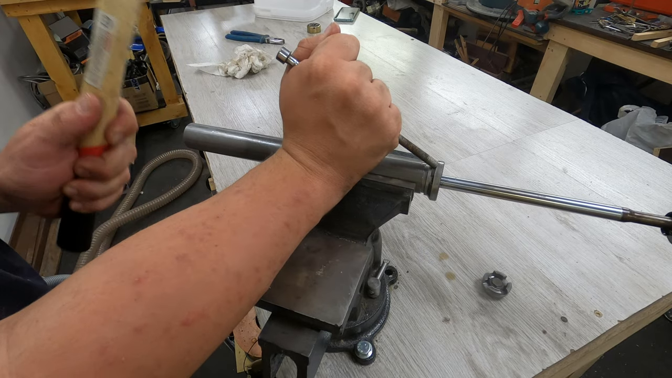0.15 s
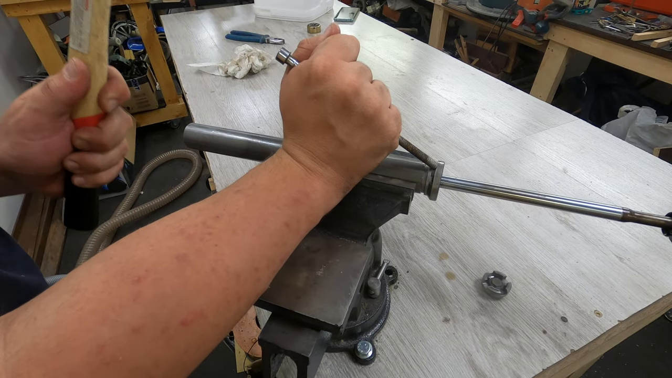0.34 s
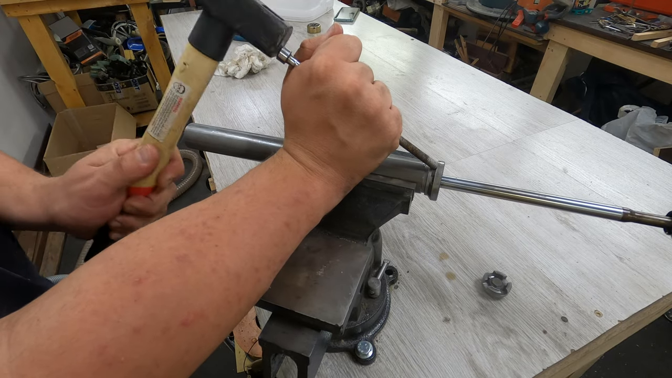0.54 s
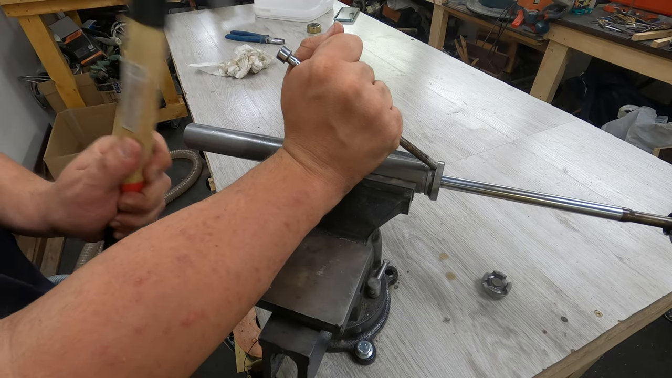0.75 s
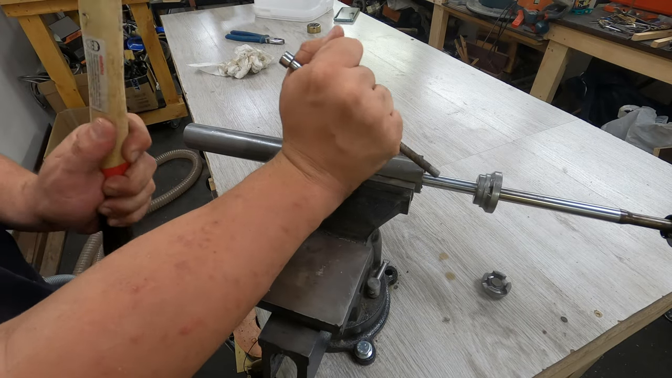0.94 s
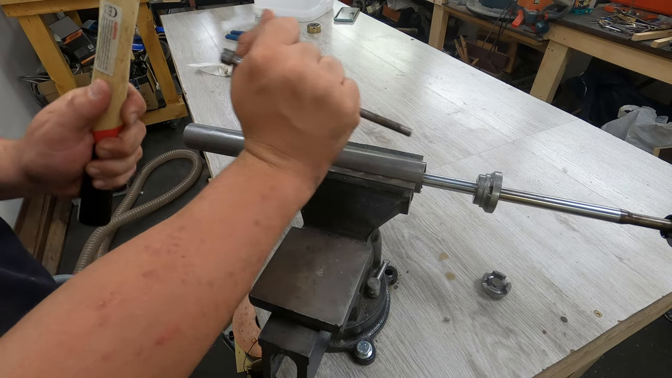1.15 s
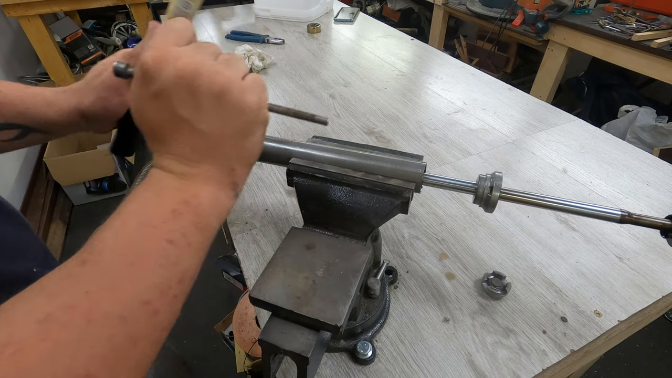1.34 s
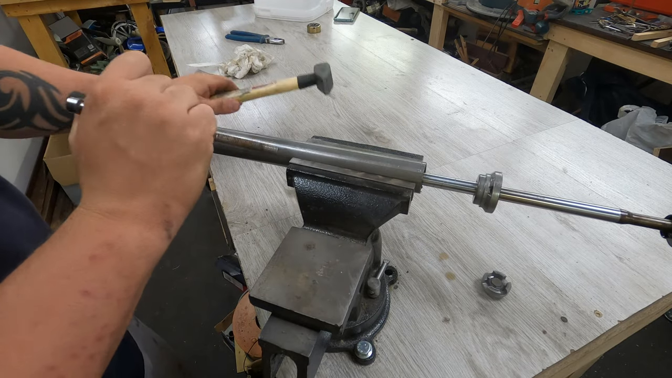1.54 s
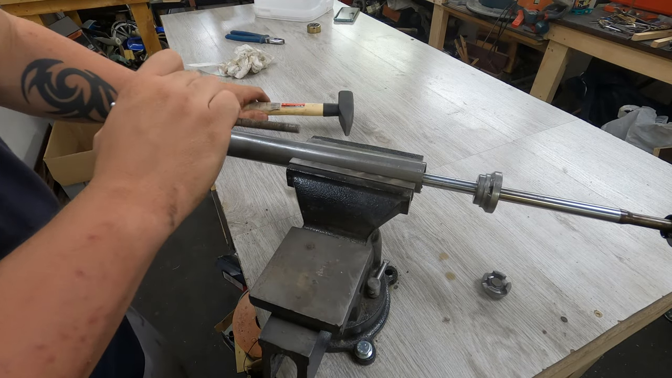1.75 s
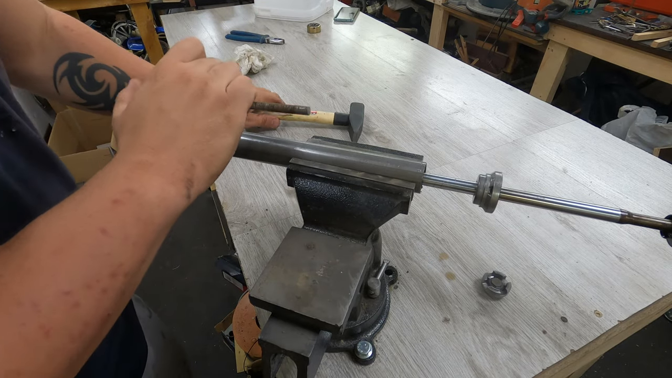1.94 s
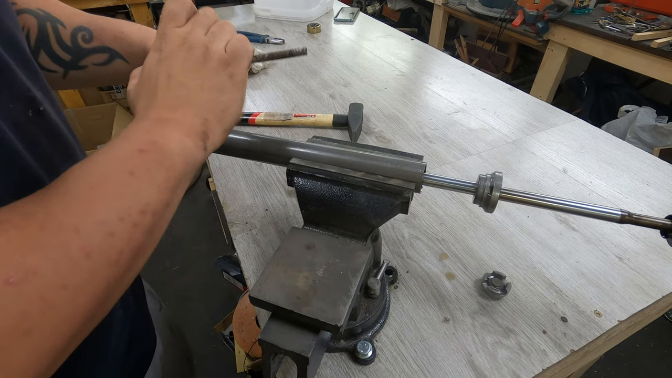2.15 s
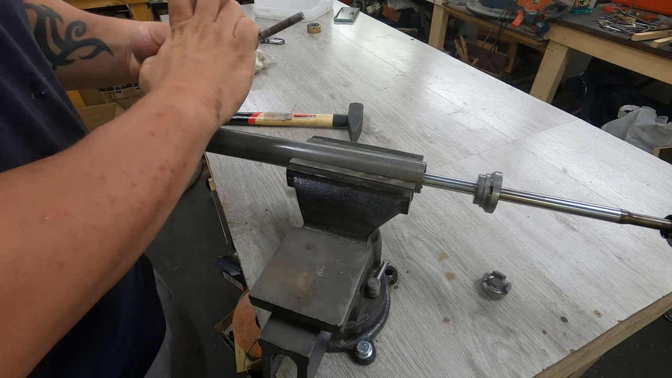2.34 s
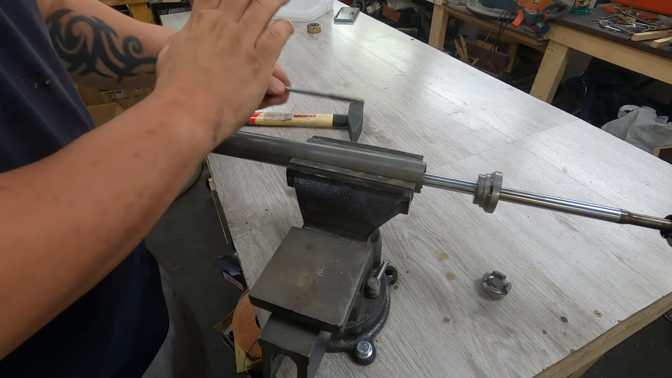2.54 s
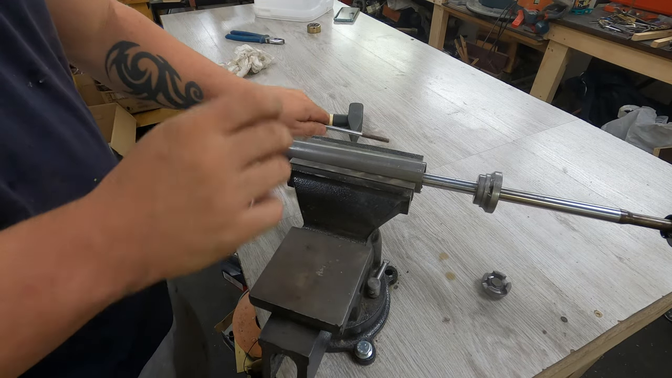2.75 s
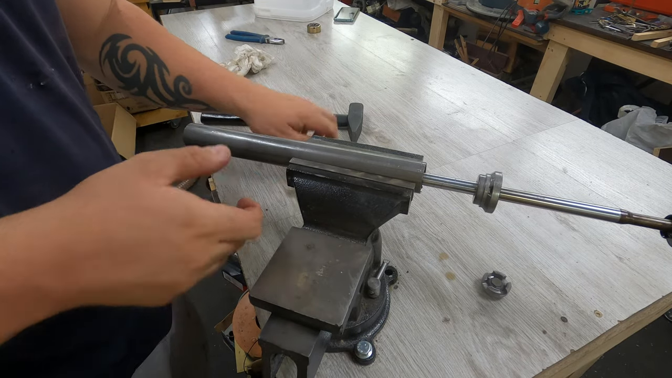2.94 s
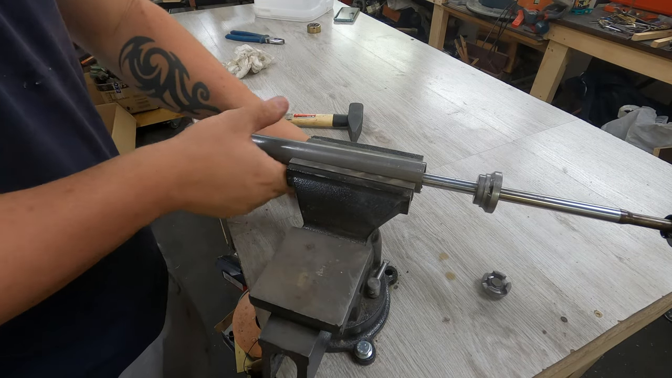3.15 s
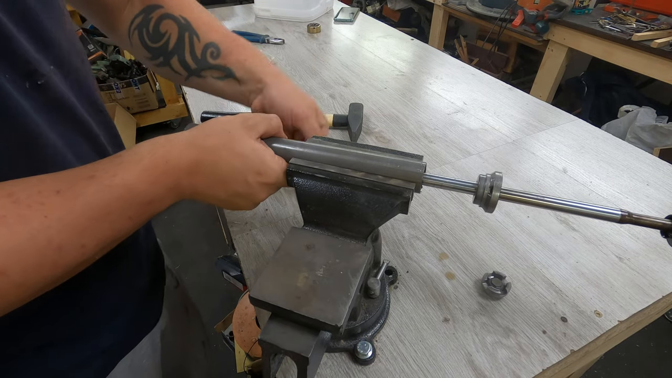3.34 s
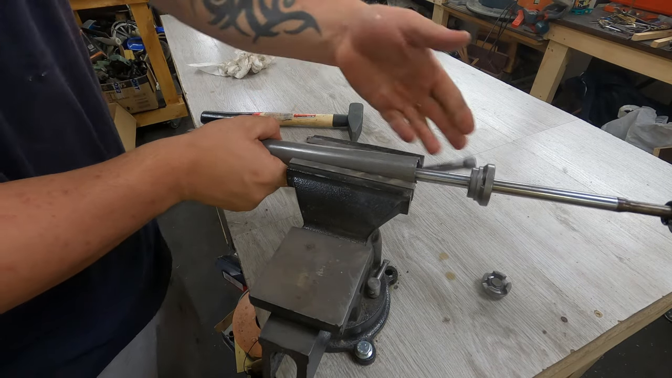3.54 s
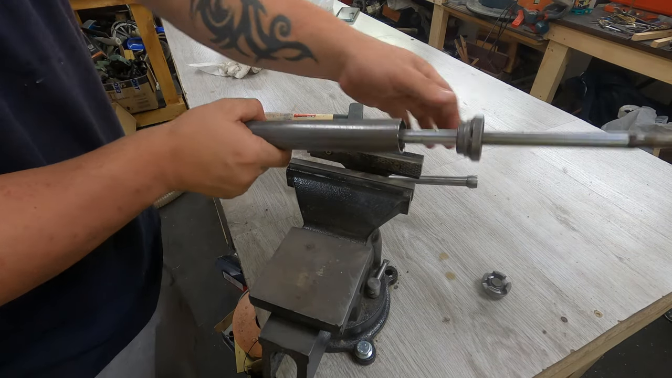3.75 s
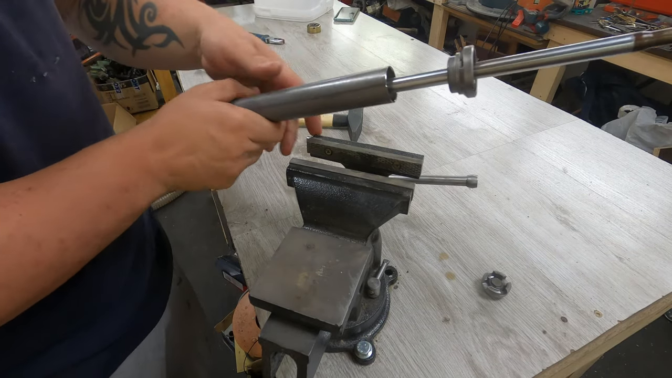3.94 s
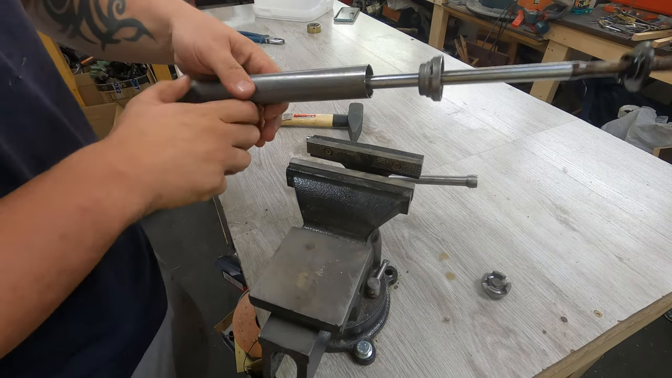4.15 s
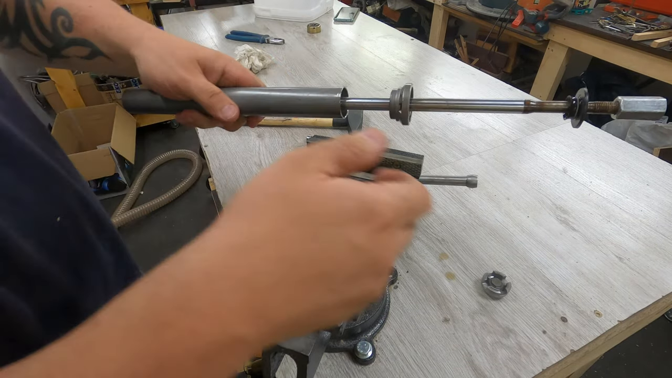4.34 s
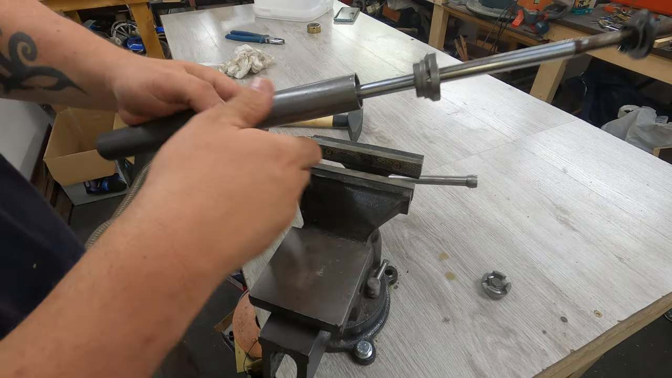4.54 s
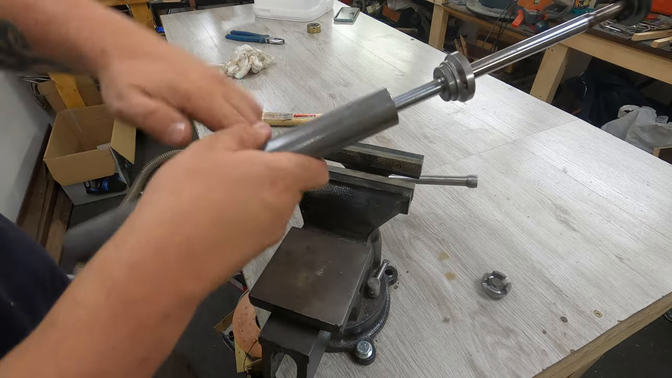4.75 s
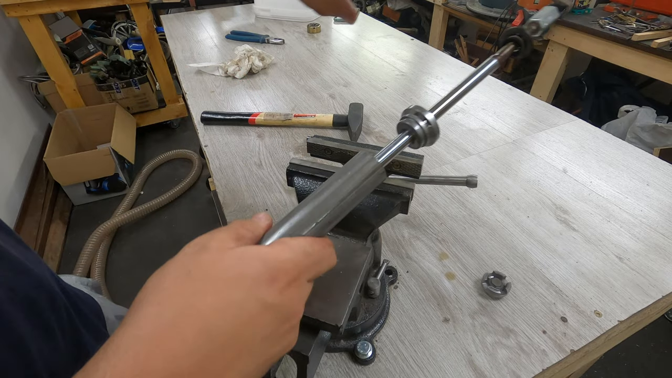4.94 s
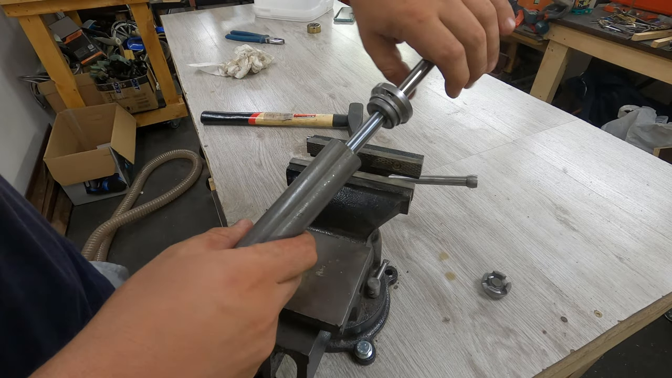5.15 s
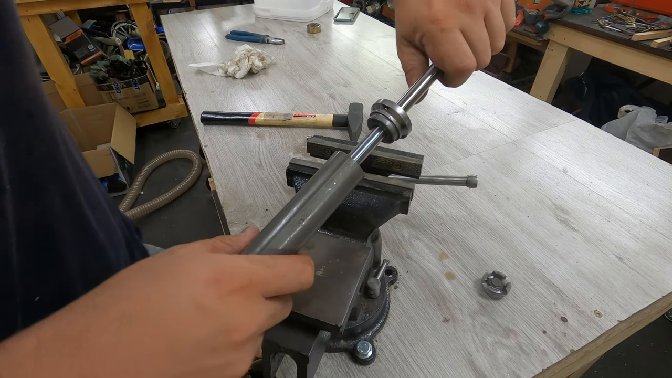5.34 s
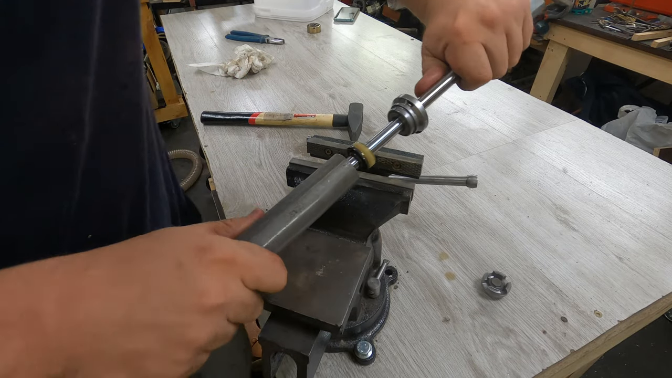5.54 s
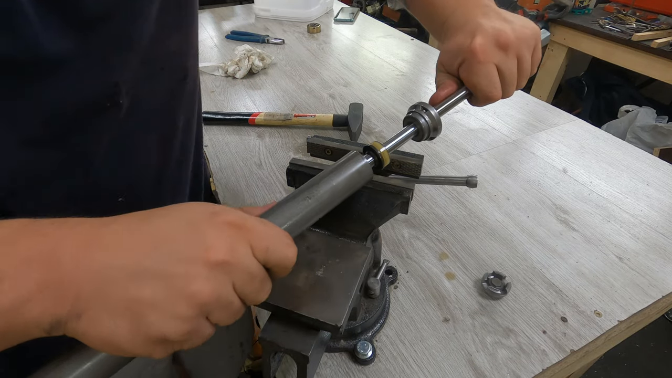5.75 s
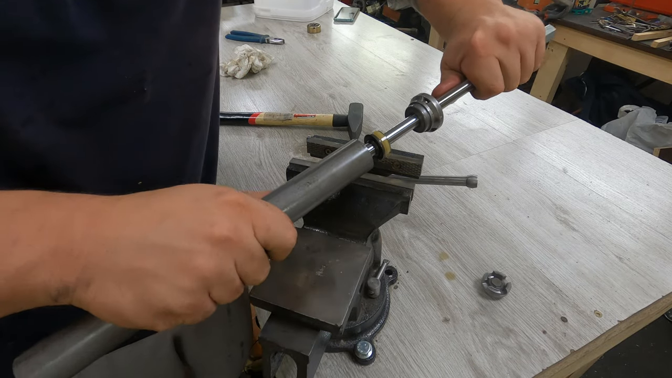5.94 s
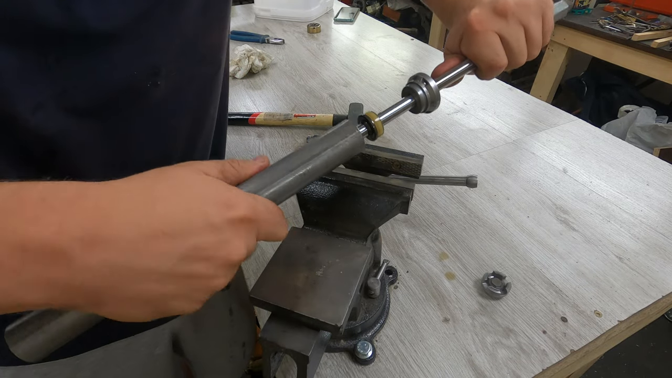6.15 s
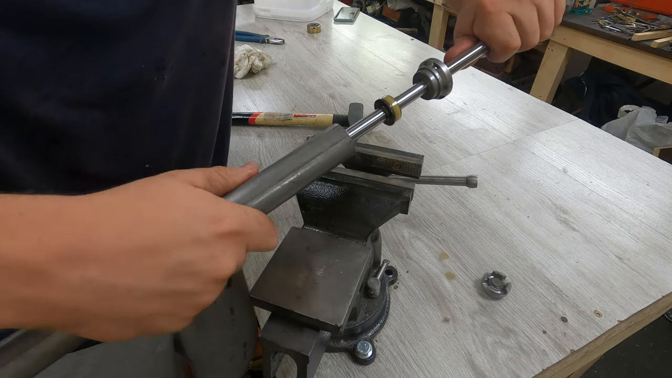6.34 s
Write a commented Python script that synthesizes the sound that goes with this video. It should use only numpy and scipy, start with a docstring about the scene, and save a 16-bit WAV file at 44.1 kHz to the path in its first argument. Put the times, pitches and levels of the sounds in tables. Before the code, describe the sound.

Close metallic hammering cracks in a live little workshop, then hammer and punch are set down, a vise loosens, and palms rub steel as a piston slides out.

```python
"""Dismantling a steel tube at the vise

A small, live workshop: a hammer drives a punch near the stereo microphones, then both tools are laid down.
The vise screw rattles open, and the piston rod is drawn out of the tube under rubbing palms.
Contacts are short force pulses into ringing modes and damped bodies; rubbing is a stream of tiny slips.
Low hum, mains hum and a far engine lie over still air; the recorder's limiter ducks the hardest blows."""
import sys
import numpy as np
from scipy import signal
from scipy.fft import rfft, irfft, next_fast_len
from scipy.io import wavfile
from scipy.ndimage import uniform_filter1d

SR = 44100
rng = np.random.default_rng(int(sys.argv[2]) if len(sys.argv) > 2 else 0)


def master_out(mix):
    """Clip the mix to full scale and print it as 16-bit PCM to the path in sys.argv[1]."""
    frames = np.transpose(np.atleast_2d(mix))
    ceiling = np.clip(frames, -1, 1)
    pcm = np.round(ceiling * 32767).astype(np.int16)
    wavfile.write(sys.argv[1], SR, pcm)


N = 286202
LEAD = SR // 5  # samples worked out ahead of the start, so that earlier sounds can ring in
TIME = np.arange(-LEAD, N) / SR  # seconds
SIZE = len(TIME)

# Contacts; strengths and thuds are relative, the contact edge is where the force loses its treble.
# Hammer on punch. Each row: start in seconds, strength in dB, contact edge in Hz, bench thud in dB.
HAMMER_BLOWS = [(-.13, 13, 11000, 13.5), (0.1318, 6.5, 16000, 7), (0.65, 0.5, 7530, 0),
                (0.8852, 5.5, 14000, 4.5)]
# Hammer laid on the wooden bench. Each row: start in seconds, strength in dB, contact edge in Hz,
# bench thud in dB.
HAMMER_KNOCKS = [(1.9445, 5.5, 10000, -6), (1.981, 7, 5030, 1.5), (1.99, 3, 2500, -20.5),
                 (2.0223, -9, 9040, 4)]
# Punch put down against steel. Each row: start in seconds, strength in dB, contact edge in Hz,
# bench thud in dB, pitch that rings most where it touches in Hz.
PUNCH_CLANKS = [(2.1118, -0.5, 5830, -1, 3980), (2.1722, -6.5, 5750, -7, 4030),
                (2.207, -17.5, 6000, -11, 3630), (2.896, -11.5, 3600, -14, 1770),
                (2.9564, 2, 9000, -4, 3100), (3.016, -21.5, 8000, -23, 2900),
                (3.022, -10.5, 9000, -21.5, 2950), (3.028, -5.5, 8000, -21.5, 3340),
                (3.051, -16.5, 7000, -27, 3300)]
# Light touches of steel parts. Each row: start in seconds, strength in dB.
STEEL_TICKS = [(0.911, -8), (1.011, -21.5), (1.803, -36), (3.227, -26.5), (3.633, -32), (3.722, -26.5),
               (3.76, -33), (5.4014, -31), (5.6187, -26.5), (6.0114, -22)]
# Punch ringing freely as it first touches. Each row: start in seconds, strength in dB, contact edge in Hz.
PUNCH_PINGS = [(2.8849, -1, 15320), (2.9562, -14, 12440)]
# Vise handle dropping against its stop and chattering. Each row: start in seconds, strength in dB,
# contact edge in Hz.
HANDLE_CLINKS = [(3.2585, -20.5, 4820), (3.2607, -17, 4200), (3.2651, -13.5, 1670)]
# Loose rod touching the tube. Each row: start in seconds, strength in dB, contact edge in Hz.
ROD_CHINKS = [(4.745, -35, 11530), (4.777, -30, 2230), (4.821, -43, 9000), (5.2308, -28.5, 2780),
              (5.2913, -41, 2983)]

# Dense, quickly damped responses: punch, wooden bench top, steel parts, bench shaken by heavy contacts,
# vise screw, piston in its bore, palms on steel. Each row: frequency in Hz, relative level in dB.
PUNCH_RESPONSE = [(400, 0.5), (550, 3.5), (730, -11.5), (1050, -2.5), (1700, -8.5), (2200, -2), (3000, -3),
                  (4100, -2.5), (6000, -5), (7700, -9.5), (8600, -12), (10200, -14.5), (12000, -25.5),
                  (16000, -25)]
WOOD_RESPONSE = [(60, -12), (100, 1), (170, 2), (250, -4), (450, 0), (600, -8.5), (1000, -7), (1500, -13),
                 (2200, -20), (3500, -23), (5500, -27.5), (8000, -39), (11000, -55.5), (16000, -82.5)]
STEEL_RESPONSE = [(200, -10.5), (320, 4), (600, 4.5), (900, 2), (1600, 6), (2400, 0), (3000, 3), (4200, -1),
                  (5500, -1.5), (7000, -12), (8200, -17.5), (10000, -31), (16000, -42.5)]
BENCH_RESPONSE = [(25, -9), (80, -6.5), (130, -7), (180, 2), (250, -0.5), (330, -3), (430, -17.5),
                  (700, -25), (1500, -40), (16000, -110)]
SCREW_RESPONSE = [(110, 7.5), (200, 2.5), (340, 7), (480, -5), (630, 6.5), (780, -1.5), (1250, -1),
                  (1700, -9), (2150, -6), (2900, -11), (3400, -16.5), (4500, -20.5), (6500, -24),
                  (9000, -42), (16000, -49)]
BORE_RESPONSE = [(290, -6.5), (500, -18.5), (766, -13), (823, -20), (1030, -5.5), (2070, -2), (2570, -6.5),
                 (4170, -14), (4600, -21), (5620, -17.5), (7360, -25.5), (15000, -68)]
PALM_RESPONSE = [(1100, 2.5), (1500, 6), (2300, 5.5), (3000, 3.5), (4500, 3.5), (6000, 1.5), (7500, -4.5),
                 (9000, -8.5), (12500, -17), (16000, -33)]

# Ringing modes: hammer head with loaded punch (brief and bright), clamped tube, vise jaws, free punch,
# vise handle, loose rod, bench. Each row: frequency in Hz, height in dB, time to decay by 60 dB in seconds.
HEAD_RING = [(2290, -28.5, 0.015), (3040, -33.5, 0.0058), (3940, -35.5, 0.0046), (5150, -24.5, 0.023),
             (7600, -29.5, 0.007)]
TUBE_RING = [(1335, -72, 1.3), (1362, -49, .18), (2223, -49, .15), (4091, -57, .65), (5351, -61, .2)]
JAW_RING = [(1175, -42, 0.027), (1516, -24.5, 0.047), (2340, -43.5, 0.019), (2963, -30.5, 0.11),
            (4190, -30.5, .025), (5300, -42, 0.16)]
PUNCH_RING = [(2840, -40.5, 0.043), (5540, -24, 0.065), (9087, -47, 0.4), (13400, -70.5, 0.28),
              (14900, -81.5, 0.23)]
HANDLE_RING = [(1141, -25, .03), (1355, -15.5, .036), (1800, -21, .018), (2500, -13.5, .016),
               (3260, -25, .015), (3740, -26, .015), (4500, -19, .01)]
ROD_RING = [(2220, -23, .09), (2570, -23, .03), (3700, -34, .04), (4480, -26, .1), (5000, -25, .02),
            (6000, -26, .12)]
BENCH_RING = [(38, -42, .15), (100, -47, .3), (158, -42, .2), (174, -28, .3), (192, -38, .18),
              (222, -39, .2), (241, -37, .28), (328, -38, .18), (501, -49, .2)]

# Palms rubbing over steel, one row for each shift of grip. Each row: firmest moment in seconds,
# level in dB, length in seconds, extra hiss in dB.
PALM_RUBS = [(3.505, -65.5, 0.19, 1.5), (4.057, -70, 0.32, 2), (4.234, -65.5, 0.34, 5.5),
             (4.48, -72.5, 1, -5), (4.723, -62.5, 0.13, 8.5), (4.824, -73.5, 0.14, 14.5),
             (5.102, -69, 0.78, -7.5), (5.469, -60.5, 0.43, -1), (5.66, -62, 0.083, -7),
             (5.943, -55, 0.45, -5.5), (6.221, -73.5, 0.18, 4), (6.42, -74.5, 0.3, 8.5)]
# Difference between right and left in the close treble: the left is louder around 2-6 kHz, the right below and
# above. Each row: frequency in Hz, right minus left in dB.
SIDE_TILT = [(200, 11), (2000, -2), (4000, -6.5), (8000, 3), (14000, 7.5)]
# Left-right likeness of diffuse sound. Each row: frequency in Hz, likeness from 0 to 1.
STEREO_LIKENESS = [(30, 0.5), (70, 1), (250, 0.97), (1000, 0.73), (2500, 0.72), (6000, 0.1), (14000, 0.4)]
# Decay of the workshop. Each row: frequency in Hz, time to decay by 60 dB in seconds.
ROOM_DECAY = [(80, 0.53), (250, 0.28), (700, 0.32), (2000, 0.32), (5000, 0.29), (9000, 0.29), (15000, 0.19)]
# Far engine speeding up and slowing. Each row: top speed in seconds, top pitch in Hz, glide in Hz per second,
# level in dB, rise in seconds, fall in seconds.
ENGINE_REVS = [(2.9, 102.8, 6, -53, 1.0, 4.1), (5.762, 81.36, 25, -39.5, 1.26, 1.12)]
# Level of the low hum. Each row: time in seconds, level in dB.
HUM_LEVEL = [(1.05, -68), (1.64, -45.5), (2.81, -48), (3.03, -70), (3.29, -48), (3.81, -57), (5.73, -48.5),
             (6.49, -56.5)]
# Still air of the shop. Each row: frequency in Hz, relative level in dB.
STILL_AIR = [(15, 1), (27, -2.5), (45, -15.5), (70, -5), (110, -14), (160, -22), (240, -20), (400, -32),
             (800, -46.5), (1150, -37), (2000, -45.5), (4000, -53.5), (7700, -58), (10000, -80)]

TICK_EDGE_HZ = 17000
# The screw rattles open in one quick turn, which goes on shaking the bench a little longer.
SCREW_START_S, SCREW_ATTACK_S, SCREW_HOLD_S, SCREW_RELEASE_DB_PER_S = 3.544, 0.025, 0.081, 446
SCREW_DB, SHAKE_DB, SHAKE_LINGER_S = -37, -46.5, 0.079
# The piston comes free, then slides out in one pull.
PULL_START_S, PULL_FASTEST_S, PULL_RISE_S, PULL_FALL_S, PULL_DB = 5.618, 5.835, 0.19, 0.22, -45.5
RUB_RISE_SHARE, HISS_ABOVE_HZ = 0.62, 6200
# A movement swells and fades: dB down at its two ends, and the roundness of its top (1 = pointed).
SWELL_DB, SWELL_ROUNDNESS = 22, 1.164
HUM_HZ, MAINS_HZ, MAINS_DB, AIR_DB = 44, 100, -63.5, -52
TOP_CUT_HZ = 17300


def from_db(db):
    """Decibels to gain."""
    return 10 ** (np.asarray(db) / 20)


def rms_one(x):
    """Scale to rms 1."""
    return x / np.sqrt(np.mean(x ** 2) + 1e-20)


def at_hz(points, hz):
    """Read a table on a log-frequency axis."""
    f, value = np.transpose(points)
    return np.interp(np.log(hz + 1e-3), np.log(f), value)


def gain_at(spectrum, hz):
    """Gain of a spectrum, falling steeply below its first point."""
    bass_fall = np.clip(hz / spectrum[0][0], .01, 1) ** 2
    return from_db(at_hz(spectrum, hz)) * bass_fall


def filtered(x, kind, edge_hz):
    """Second-order low-pass or high-pass filter."""
    return signal.sosfilt(signal.butter(2, edge_hz, kind, fs=SR, output="sos"), x)


def convolve(x, response):
    """Pass a sound through a mono or stereo response."""
    return signal.fftconvolve(np.atleast_2d(x), np.atleast_2d(response), axes=1)[:, :SIZE]


def diffuse(spectrum, size):
    """Coloured stereo noise whose sides are alike by frequency; rms 1."""
    padded = next_fast_len(size)
    hz = np.fft.rfftfreq(padded, 1 / SR)
    mid, side = rfft(rng.standard_normal((2, padded)))
    alike = at_hz(STEREO_LIKENESS, hz)
    pair = np.sqrt(1 + alike) * mid + np.sqrt(1 - alike) * side * [[1], [-1]]
    return rms_one(irfft(pair * gain_at(spectrum, hz), padded)[:, :size])


def drift(rate):
    """Slow chance: random points of spread 1, rate of them per second, joined by lines."""
    return np.interp(TIME - TIME[0], np.arange(2000) / rate, rng.standard_normal(2000))


def contacts(rows, size=256):
    """One force pulse for each contact; a softer contact has a lower edge."""
    force = np.zeros(SIZE)
    for start_s, db, edge_hz, *_ in rows:
        at = LEAD + round(start_s * SR)
        softening = signal.butter(2, min(edge_hz, .45 * SR), fs=SR)
        pulse = signal.lfilter(*softening, signal.unit_impulse(size))
        force[at:at + size] += from_db(db) * pulse
    return force


def body(force, spectrum, size=8192):
    """Many damped modes merge into one causal (minimum-phase) response of unit energy."""
    cepstrum = irfft(np.log(gain_at(spectrum, np.fft.rfftfreq(size, 1 / SR))))
    response = irfft(np.exp(rfft(2 * cepstrum[:size // 2], size)))
    return convolve(force, response / np.linalg.norm(response))[0]


def ring(force, modes, uneven_db=2.0):
    """Each mode is a decaying sine, excited more or less depending on where the contact falls."""
    out = 0
    for k, (hz, db, t60) in enumerate(modes):
        radius = from_db(-60 / (t60 * SR))  # decay over one sample
        angle = 2 * np.pi * hz / SR
        drive = force * from_db(db + uneven_db * drift(60))
        poles = [1, -2 * radius * np.cos(angle), radius * radius]
        mode = signal.lfilter([0, np.sin(angle)], poles, drive + 1e-18)
        out = out + (-1) ** k * mode  # neighbouring modes have opposite signs
    return out


def friction(per_s, spread_db):
    """Tiny slips of uneven size at random moments; rms 1."""
    size_db = spread_db * np.minimum(rng.exponential(1, SIZE), 4)
    slips = from_db(size_db) * rng.choice([-1, 1], SIZE)
    return rms_one(slips * (rng.random(SIZE) < per_s / SR))


def swell(top_s, rise_s, fall_s):
    """Gain of one movement, which gathers speed up to its top and slows again."""
    away = np.maximum((top_s - TIME) / rise_s, (TIME - top_s) / fall_s)
    return from_db(-np.minimum(SWELL_DB * away ** SWELL_ROUNDNESS, 200))


def tone(hz):
    """A sine of rms 1 on a pitch curve."""
    return np.sqrt(2) * np.sin(2 * np.pi * np.cumsum(hz) / SR)


def hammering():
    """Each blow cracks through the punch with a colour of its own; the clamped tube rings on."""
    force = contacts(HAMMER_BLOWS)
    head = ring(force, HEAD_RING, uneven_db=3.5)
    tube = ring(force, TUBE_RING, uneven_db=1.0)
    return body(force, PUNCH_RESPONSE) + head, tube


def tools_laid_down(clatter_db=4.5, spot_db=-8, spot_t60_s=0.003):
    """The hammer knocks on wood; the punch clatters on the vise, each spot with a brief ring of its own."""
    knocks = body(contacts(HAMMER_KNOCKS), WOOD_RESPONSE)
    force = contacts(PUNCH_CLANKS)
    clatter = from_db(clatter_db) * body(force, STEEL_RESPONSE)
    jaws = ring(force, JAW_RING, uneven_db=3.0)
    spots = 0
    for row in PUNCH_CLANKS:
        spots = spots + ring(contacts([row]), [(row[-1], spot_db, spot_t60_s)], uneven_db=1.0)
    return knocks + clatter + jaws + spots


def free_rings(click_db=3.5):
    """Punch, vise handle and rod ring freely at their own modes, close to the microphones."""
    clink = contacts(HANDLE_CLINKS)
    punch = ring(contacts(PUNCH_PINGS), PUNCH_RING, uneven_db=.5)
    handle = ring(clink, HANDLE_RING, uneven_db=.5)
    rod = ring(contacts(ROD_CHINKS), ROD_RING, uneven_db=2.0)
    click = from_db(click_db) * body(clink, STEEL_RESPONSE)
    return punch + handle + click + rod


def screw_turn(hold_s):
    """Force of the turn: attack, hold, release."""
    t = TIME - SCREW_START_S
    released_s = np.clip(t - SCREW_ATTACK_S - hold_s, 0, 1)
    return np.clip(t / SCREW_ATTACK_S, 0, 1) * from_db(-SCREW_RELEASE_DB_PER_S * released_s)


def vise_screw():
    """The loose thread rattles; gives its sound and the force that shakes the bench."""
    rattle = friction(per_s=700, spread_db=2.5)
    sound = body(from_db(SCREW_DB) * screw_turn(SCREW_HOLD_S) * rattle, SCREW_RESPONSE)
    shake = from_db(SHAKE_DB) * screw_turn(SCREW_HOLD_S + SHAKE_LINGER_S) * rattle
    return sound, shake


def piston_pull(judder_db=3.0):
    """The piston scrapes along the bore in many tiny slips, with an uneven judder."""
    pull = swell(PULL_FASTEST_S, PULL_RISE_S, PULL_FALL_S) * (TIME > PULL_START_S)
    scrape = body(friction(per_s=5000, spread_db=0.0), BORE_RESPONSE)
    return from_db(PULL_DB) * pull * from_db(judder_db * drift(45)) * scrape


def palm_rubs():
    """The hands shift their grip in slips of skin on steel; dry skin hisses more."""
    skin = body(friction(per_s=5700, spread_db=5.5), PALM_RESPONSE)
    # filtered both ways, so that the hiss can be subtracted cleanly
    hiss = signal.sosfiltfilt(signal.butter(2, HISS_ABOVE_HZ, "high", fs=SR, output="sos"), skin)
    out = 0
    for top_s, db, length_s, hiss_db in PALM_RUBS:
        rub = swell(top_s, RUB_RISE_SHARE * length_s, (1 - RUB_RISE_SHARE) * length_s)
        out = out + from_db(db) * rub * (skin - hiss + from_db(hiss_db) * hiss)
    return out


def small_touches(thin_hz=1300):
    """Light contacts move too little mass to sound in the bass."""
    ticks = [(start_s, db, TICK_EDGE_HZ) for start_s, db in STEEL_TICKS]
    force = contacts(ticks + ROD_CHINKS)
    return body(filtered(force, "high", thin_hz), STEEL_RESPONSE)


def near_field(x, glance_s=0.0014, glance_db=-15, ripple=0.21, split_hz=1100, size=700):
    """Vise, tube and hands scatter the treble over a few milliseconds, differently for each microphone."""
    t, hz = np.arange(size) / SR, np.fft.rfftfreq(2 * size, 1 / SR)
    envelope = np.exp(-(t / .0026) ** 2) + from_db(glance_db) * np.exp(-t / glance_s)
    paths = rfft(diffuse([(20, 0), (20000, 0)], size) * envelope, 2 * size)
    paths = paths / np.abs(paths) ** (1 - ripple)  # the paths smear more than they colour
    scatter = irfft(paths)[:, :size]
    scatter /= np.linalg.norm(scatter, axis=1, keepdims=True)
    tilt = from_db(at_hz(SIDE_TILT, hz) * [[-.5], [.5]])  # half off the left, half onto the right
    scatter = irfft(rfft(scatter, 2 * size) * tilt)[:, :size]
    return filtered(x, "low", split_hz) + convolve(filtered(x, "high", split_hz), scatter)


def workshop(x, room_db, build_s=0.0027):
    """Reflections build up quickly and die away, each band at its own rate."""
    t = np.arange(SR * 3 // 4) / SR
    hz, centres = np.fft.rfftfreq(len(t), 1 / SR), [f for f, _ in ROOM_DECAY]
    noise, tail = rfft(diffuse([(50, 0), (20000, 0)], len(t))), 0
    # each row of the identity matrix opens one band, which fades into its neighbours
    for share, (_, t60) in zip(np.eye(len(centres)), ROOM_DECAY):
        band = irfft(noise * at_hz(list(zip(centres, share)), hz), len(t))
        tail = tail + band * from_db(-60 * t / t60)
    tail = tail * (1 - np.exp(-(t / build_s) ** 2))
    return from_db(room_db) * convolve(x, rms_one(tail) / np.sqrt(len(t)))


def far_engine(octave_db=-11, room_mode_hz=145, mode_width_hz=3, flutter_db=2.5):
    """Pitch and level rise and fall together; the octave swells as it glides through a room resonance."""
    out = 0
    for top_s, top_hz, glide, db, rise_s, fall_s in ENGINE_REVS:
        hz = np.maximum(top_hz - glide * np.abs(TIME - top_s), top_hz / 2)
        octave = from_db(octave_db) / np.hypot(1, (2 * hz - room_mode_hz) / mode_width_hz)
        level = from_db(db + flutter_db * drift(24)) * swell(top_s, rise_s, fall_s)
        out = out + level * (tone(hz) + octave * tone(2 * hz))
    return out


def low_hum(waver_hz=0.99):
    """A low sine whose pitch wavers and whose level comes and goes."""
    level = from_db(np.interp(TIME, *np.transpose(HUM_LEVEL)))
    return level * tone(HUM_HZ + waver_hz * drift(3.9))


def background():
    """Far engine, low hum and a steady mains sine over the diffuse noise of still air."""
    mains = from_db(MAINS_DB) * tone(np.full(SIZE, MAINS_HZ))
    air = from_db(AIR_DB) * diffuse(STILL_AIR, SIZE)
    return far_engine() + low_hum() + mains + air


def scene(bench_db=4.5):
    """Heavy contacts also shake the bench; each source reaches the microphones by its own paths."""
    blows, tube = hammering()
    tools, rings = tools_laid_down(), free_rings()
    screw, shake = vise_screw()

    heavy = HAMMER_BLOWS + HAMMER_KNOCKS + PUNCH_CLANKS
    thuds = contacts([(start_s, thud_db, edge_hz) for start_s, _, edge_hz, thud_db, *_ in heavy])
    bench = from_db(bench_db) * body(thuds + shake, BENCH_RESPONSE)
    boom = ring(thuds, BENCH_RING, uneven_db=2.0)
    handling = small_touches() + screw + piston_pull() + palm_rubs() + bench

    # tube and bench modes stay centred and without reverberation
    direct = near_field(blows) + near_field(tools) + near_field(handling + rings) + tube + boom
    room = workshop(blows, room_db=-1.0) + workshop(tools, room_db=0.0)
    room = room + workshop(handling, room_db=-1.37) + workshop(rings, room_db=-10)
    left, right = direct + room * from_db([[.5], [-.5]]) + background()
    # the work lies a little to the right, so the left side hears it one sample later
    left = np.roll(left, 1)
    return np.array([left, right])[:, LEAD:]


def record(dry, threshold_db=-21, release_db_per_s=85, attack_s=0.0019, ceiling_db=-6):
    """A limiter ducks loud blows and recovers during their tails; peaks are rounded and the top is cut."""
    power = uniform_filter1d(np.mean(dry ** 2, axis=0), size=88)  # mean over 2 ms
    over_db = np.maximum(10 * np.log10(np.abs(power) + 1e-12) - threshold_db, 0)
    # a running maximum on a rising ramp: the ducking recovers at a steady rate
    recovery_db = release_db_per_s * np.arange(N) / SR
    duck_db = np.maximum.accumulate(over_db + recovery_db) - recovery_db
    keep = np.exp(-1 / (attack_s * SR))
    smooth_duck_db = signal.lfilter([1 - keep], [1, -keep], duck_db)
    limited = dry * from_db(-smooth_duck_db)
    rounded = from_db(ceiling_db) * np.tanh(limited / from_db(ceiling_db))
    return signal.sosfilt(signal.cheby2(16, 70, TOP_CUT_HZ, fs=SR, output="sos"), rounded)


dry = scene()
out = record(dry)
master_out(out)
```